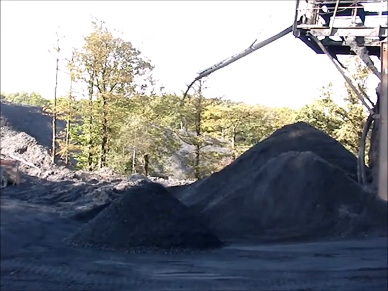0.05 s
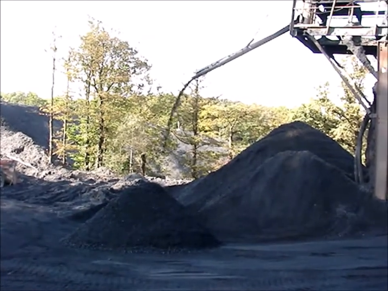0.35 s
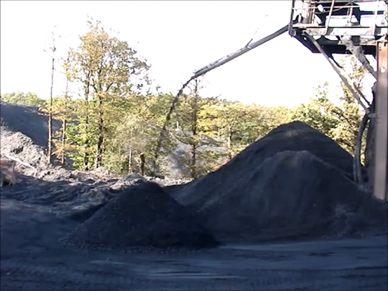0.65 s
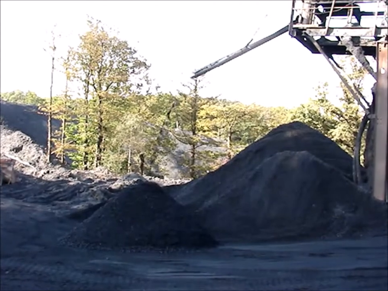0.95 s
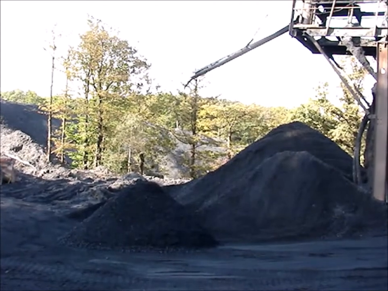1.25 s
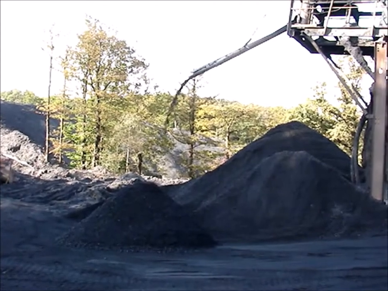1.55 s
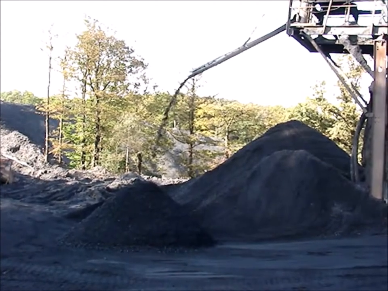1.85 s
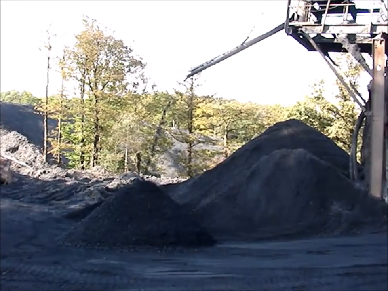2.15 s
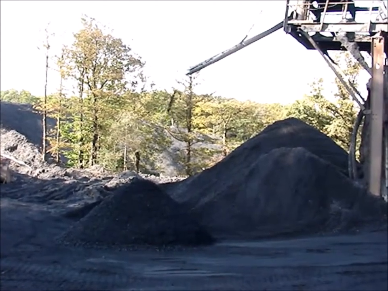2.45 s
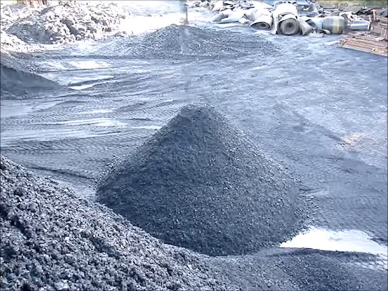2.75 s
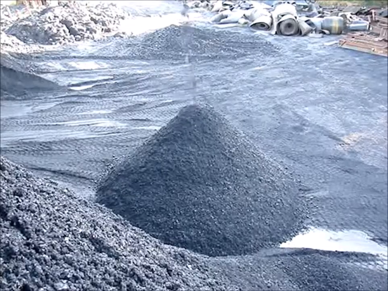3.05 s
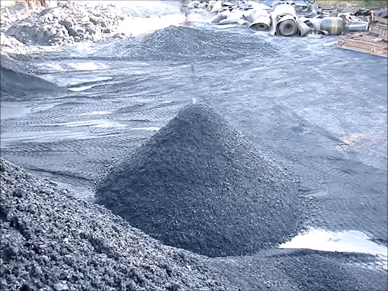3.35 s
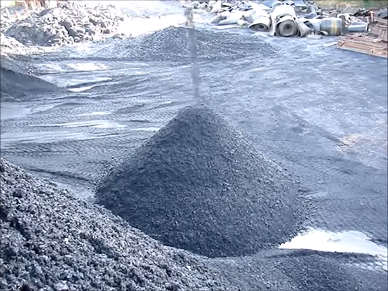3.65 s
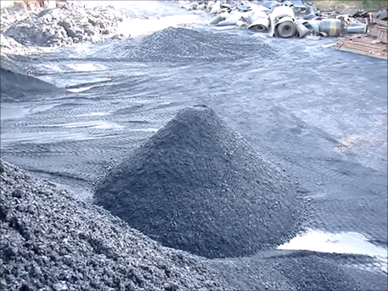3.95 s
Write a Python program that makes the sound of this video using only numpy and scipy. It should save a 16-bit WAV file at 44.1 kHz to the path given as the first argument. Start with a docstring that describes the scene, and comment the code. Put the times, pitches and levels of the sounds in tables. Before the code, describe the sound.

Loose coal falls on a pile, grit hissing and lumps clattering, first distant, then closer.

```python
"""Loose coal pours off a conveyor onto a heap in an open yard. Fines rustle, pebbles and grit patter,
and lumps crack down and scatter chips, some knocking on the conveyor's steel.
Plant machinery rumbles and hums nearby. One microphone listens from across the yard,
then, after a moment of silence, from nearer, above the heap."""
import sys
import numpy as np
from scipy import signal
from scipy.fft import rfft, irfft
from scipy.io import wavfile
from scipy.ndimage import uniform_filter1d, map_coordinates

SR = 44100
rng = np.random.default_rng(int(sys.argv[2]) if len(sys.argv) > 2 else 0)


def dump_mix(stems):
    """Bounce the given channels to the path in sys.argv[1] as a 16-bit WAV at rate SR."""
    frames = np.atleast_2d(stems).T  # one column per channel
    limited = np.clip(frames, -1, 1)  # hard clip at full scale
    pcm = np.round(limited * 32767).astype(np.int16)
    wavfile.write(sys.argv[1], SR, pcm)


N = 176400
GAP_START_S, GAP_END_S = 2.631, 2.682  # the silence between the two microphone positions

# Lumps landing; hard ones rise quickly, crumbling ones slowly:
# start_s, level_db, thud_db, crack_db, ring_hz, rise_s
LANDINGS = [(0.2001, -14.5, -10, -8.5, 3216, 0.000087), (.232, -18, -20, -24, 1193, 0.0012),
            (0.263, -20.5, -14, -2.5, 2006, 0.00084), (0.3249, -10, -18.5, -16, 3570, 0.0039),
            (0.344, -14, -9.5, -6, 2290, 0.00012), (.703, -18.5, -16, -1.5, 1400, 0.0037),
            (0.75, -19, -11, -15, 1110, 0.0012), (.921, -20.5, -4, -11, 2910, 0.00058),
            (1.0265, -11.5, -13.5, -6, 2200, 0.00015), (1.066, -12.5, -9, -15, 2020, 0.0035),
            (1.254, -18.5, -15, -9.5, 1980, .00015), (1.322, -22, -21, -5, 1190, .0005),
            (1.421, -18.5, -5, -12.5, 3050, 0.00082), (1.5392, -14.5, -5.5, -4.5, 4010, 0.00027),
            (1.6893, -11, -5.5, -8.5, 3563, 0.00045), (1.736, -18.5, -2.5, -10, 2970, 0.00089),
            (1.7674, -14.5, -7.5, -21.5, 1110, 0.0001), (1.892, -25, -12, 3, 1910, 0.00045),
            (1.913, -22.5, -22, 1, 4770, 0.00044), (1.958, -15.5, -8, -7, 3080, .00012),
            (2.0055, -12.5, -5.5, -15, 1905, 0.00083), (2.031, -14, -12.5, -27, 2750, 0.0029),
            (2.114, -15, -7.5, -1, 2750, 0.0047), (2.194, -21.5, -20, -1, 2120, 0.00076),
            (2.299, -19, -11, -4, 2000, .001), (2.3922, -16.5, -8.5, -18, 4120, .00012),
            (2.413, -15.5, -8, -4, 4460, 0.00014), (2.463, -16, -8, -8, 1406, 0.00015),
            (2.5679, -16.5, -9, -9, 4740, 0.0001), (2.6838, -16, -8, -11, 2650, 0.00014),
            (2.729, -19, -1, -1.5, 3920, .0005), (2.798, -9, -23, -8, 2736, 0.0021),
            (2.8398, -10, -22, -12, 4480, 0.0017), (2.8644, -12, -29, -1.5, 4560, 0.00062),
            (2.944, -13, -23, -3.5, 2730, 0.0018), (2.9630, -8, -30, -7.5, 3020, 0.00023),
            (3.04, -16, -7.5, -3.5, 2460, 0.00081), (3.092, -6.5, -11.5, -2.5, 2340, 0.0036),
            (3.108, -16, -3, -22, 1750, 0.0015), (3.128, -8, -20, -6.5, 3200, 0.0013),
            (3.154, -9.5, -13, -8.5, 3560, 0.00082), (3.2306, -8, -8, -28, 1950, 0.00013),
            (3.2435, -15, -19, -7, 3600, .00015), (3.285, -9.5, -24, -7.5, 2626, 0.0018),
            (3.3577, -16, -21.5, -6, 3540, 0.00011), (3.384, -9.5, -24, -12.5, 1990, 0.0033),
            (3.3937, -9.5, -7.5, -10.5, 2000, 0.00015), (3.4664, -10.5, -33, -5, 3120, 0.00023),
            (3.498, -14, -24, -3, 2470, 0.00043), (3.5140, -11.5, -32, -14, 3350, .0006),
            (3.5901, -8.5, -27, -25, 2580, .00012), (3.6276, -10.5, -20, -7.5, 2614, 0.00032),
            (3.6928, -13.5, -32, -5.5, 2960, 0.00048), (3.733, -17, -20, -7, 2760, 0.00078),
            (3.745, -14.5, -28, -3, 4300, 0.00091), (3.776, -17.5, -32, 0, 4360, 0.00012),
            (3.8134, -10.5, -23, -13, 2830, 0.0001), (3.858, -16, -19, -6, 3900, 0.0004),
            (3.875, -20, -18, -3, 2750, 0.00092), (3.8998, -17, -20, -15, 3730, .001),
            (3.941, -16.5, -7, -6.5, 4720, 0.00036)]
# Spectrum of a hard piece's first contact: frequency_hz, level_db
SNAP_SPECTRUM = [(300, -16), (900, -5), (2000, 0.5), (3800, 3.5), (5500, -4), (7500, -8.5), (10000, -25)]
# Spectrum of crunching chips: frequency_hz, level_db
CRUNCH_SPECTRUM = [(800, -43), (1500, -3.5), (2200, 2.5), (3000, 3.5), (4200, 0.5), (5200, -12.5),
                   (7000, -46)]
# Loudness of the plant, which the conveyor's rattle follows: time_s, level_db
PLANT_LEVEL = [(0, -41), (.9, -41.5), (1.8, -40.5), (2.62, -40), (2.68, -33), (3.03, -36), (3.2, -44),
               (3.45, -43), (4, -50)]


def far_pour():
    """From across the yard the fines blur into a dry rustle, with pebbles and grit pattering in it."""
    # Spectra of fines and pebbles at a distance: frequency_hz, level_db
    fines_spectrum = [(150, -54), (250, -9), (368, 0), (682, -2.5), (760, 1), (1720, 0.5), (1890, 2.5),
                      (2530, -0.5), (5070, -7.5), (6390, -36), (7460, -17), (10000, -33), (13000, -48.5),
                      (22000, -120)]
    pebble_spectrum = [(150, -35), (400, -14.5), (1000, -20.5), (2000, -24), (3500, 1.5), (4800, 0.5),
                       (6000, -3.5), (8000, -6.5), (10000, -19)]
    # Strength of the pour: time_s, level_db
    flow = [(0, -29.5), (.13, -29.5), (.3, -31), (.42, -32), (.63, -31.5), (.7, -29), (.9, -30), (1.1, -30),
            (1.3, -30.5), (1.5, -31.5), (1.66, -33), (1.82, -31), (1.94, -30), (2.08, -30), (2.3, -30.5),
            (2.6, -29.5)]
    flutter = amp(0.5 + 0.94 * wobble(24.72))
    fines = flutter * patchy(colour(ticks(9000, N), fines_spectrum), depth_db=2.0)
    patter = amp(-7.0) * pebbles(pebble_spectrum, per_s=170, spread_db=5, t60=0.033, ring_hz=2484)
    return amp(curve(flow)) * (fines + patter + amp(-14) * grit())


def near_pour():
    """From above the heap the pour is brighter and its pebbles and grit stand out."""
    # Spectra of fines and pebbles close up: frequency_hz, level_db
    fines_spectrum = [(150, -34), (250, -2), (403, -3.5), (846, 3), (1020, -1.5), (1690, 8.5), (1950, 5.5),
                      (2450, 5.5), (2910, 5), (4210, 2.5), (7460, -14), (10000, -16.5), (13000, -57),
                      (22000, -120)]
    pebble_spectrum = [(150, -24), (400, -7), (1000, 1), (2000, -1.5), (3500, -1), (4800, -1), (6000, -4),
                       (8000, -6), (10000, -18.5)]
    # Strength of the pour: time_s, level_db
    flow = [(2.7, -25.5), (2.894, -23), (2.956, -23), (3.644, -29), (3.934, -30.5), (4.0, -29.5)]
    flutter = amp(-2.5 + 0.77 * wobble(24.81))
    fines = flutter * patchy(colour(ticks(9000, N), fines_spectrum), depth_db=0.5)
    patter = amp(-4.5) * pebbles(pebble_spectrum, per_s=150, spread_db=7, t60=0.032, ring_hz=2820)
    return amp(curve(flow)) * (fines + patter + amp(-9.5) * grit())


def pebbles(spectrum, per_s, spread_db, t60, ring_hz):
    """Small pieces land at random, each with a short dry crunch and a trace of a ring."""
    out, t = np.zeros(N), np.arange(SR // 25) / SR
    candidates = 1200
    for (when, chance, size), pitch in zip(rng.random((candidates, 3)), rng.standard_normal(candidates)):
        ring = np.sin(2 * np.pi * ring_hz * np.exp(.45 * pitch) * t)
        envelope = amp(spread_db * size ** 2 - 60 * t / t60)
        sound = (rng.standard_normal(len(t)) + .3 * ring) * envelope
        if chance < per_s * N / SR / candidates:
            add(out, when * N / SR, sound)
    return colour(out, spectrum)


def grit(per_s=150, t60=.006):
    """Sharp grains tick one by one: most are faint, a few stand out."""
    # Spectrum of the grains: frequency_hz, level_db
    grit_spectrum = [(1500, -25), (3500, 0.5), (5000, 2), (7500, -5.5), (10000, -18)]
    out, t = np.zeros(N), np.arange(SR // 200) / SR
    for when, size in rng.random((int(per_s * N / SR), 2)):
        db = -4 * np.log(size + .03)
        add(out, when * N / SR, rng.standard_normal(len(t)) * amp(db - 60 * t / t60))
    return colour(out, grit_spectrum)


def lumps(snap_t60=0.0072, ring_t60=0.052):
    """Each lump snaps, rings, cracks, crunches and thuds into the heap; the bright part dies first."""
    # Spectra of a landing's bright crack and low thud: frequency_hz, level_db
    crack_spectrum = [(3000, -19.5), (4700, 5.5), (5600, -0.5), (7000, -8.5), (8500, -14), (10000, -29.5)]
    thud_spectrum = [(80, -31), (200, -9.5), (420, -7), (1100, 0.5), (1500, -0.5), (2300, -35)]
    out, t = np.zeros(N), np.arange(SR // 8) / SR
    for s, db, thud_db, crack_db, hz, rise_s in LANDINGS:
        hardness = np.exp(-rise_s / 0.00084)  # crumbling lumps barely snap
        contact = colour(rng.standard_normal(len(t)), SNAP_SPECTRUM)
        snap = amp(-8.5 - 60 * t / snap_t60) * hardness * contact
        ring = amp(-5 - 60 * t / ring_t60) * (1 - np.exp(-t / rise_s)) * dull_ring(hz, t)
        add(out, s, amp(db) * (snap + ring))
        add(out, s, amp(db - 0.5 + crack_db) * clatter(crack_spectrum, rise_s, t60=0.04))
        add(out, s, amp(db - 6) * clatter(CRUNCH_SPECTRUM, rise_s, t60=0.068))
        add(out, s, amp(db - 4 + thud_db) * clatter(thud_spectrum, rise_s + 0.0027, t60=0.072))
    return out


def clatter(spectrum, rise_s, t60, scatter_db=-31, scatter_t60=0.14):
    """A quick clatter of chips, then a weak scatter as they run off."""
    t = np.arange(SR // 6) / SR
    chips = colour(ticks(per_s=20000, size=len(t)), spectrum)
    fall = amp(-60 * t / t60) + amp(scatter_db - 60 * t / scatter_t60)
    return chips * (1 - np.exp(-t / rise_s)) * fall


def dull_ring(hz, t, width_hz=110):
    """Coal rings impurely: a drifting phase smears its tone."""
    drift = np.cumsum(rng.standard_normal(len(t))) * np.sqrt(2 * np.pi * width_hz / SR)
    return np.sin(2 * np.pi * hz * t + drift)


def rebounds(within_s=0.019, t60=0.021):
    """Three chips break off each lump and clack down just after it, the later the softer."""
    out, t = np.zeros(N), np.arange(SR // 40) / SR
    for s, db, *_ in LANDINGS:
        for lateness in rng.random(size=3):
            clack = colour(rng.standard_normal(len(t)), CRUNCH_SPECTRUM) * amp(-60 * t / t60)
            add(out, s + .003 + lateness * within_s, amp(db - 17.5 - 6 * lateness) * clack)
    return out


def clicks(t60=0.016):
    """Single hard pebbles snap on the heap without breaking."""
    # Pebbles that click out of the pour: start_s, level_db
    hard_pebbles = [(0.077, -21), (.674, -23), (.794, -22.5), (0.95, -23), (1.196, -23), (1.411, -19.5),
                    (1.865, -21), (2.127, -20), (2.206, -21), (2.439, -17), (2.607, -29.5), (2.789, -15.5),
                    (3.181, -20.5), (3.558, -16)]
    out, t = np.zeros(N), np.arange(SR // 40) / SR
    for s, db in hard_pebbles:
        add(out, s, amp(db - 60 * t / t60) * colour(rng.standard_normal(len(t)), SNAP_SPECTRUM))
    return out


def conveyor(rattle_db=-50.5):
    """Fines keep the steel ringing faintly, and now and then a lump knocks on it."""
    # Modes of the steel: pitch_hz, level_db, t60_s
    steel_modes = [(450.8, -4.5, 0.13), (624, -2, 0.082), (1137, 0, 0.067)]
    # Lumps striking it: start_s, level_db, tilt_db_per_octave
    knocks = [(.232, -23, 0), (.328, -21, 0), (.345, -21.5, -7), (1.027, -23.5, 0), (1.768, -29.5, 5),
              (2.298, -41, 17), (3.109, -26, 12.5), (3.232, -30, 11)]
    out, t = np.zeros(N), np.arange(SR // 3) / SR
    plant_db = curve(PLANT_LEVEL)
    for hz, mode_db, t60 in steel_modes:
        ring = amp(-60 * t / t60) * np.sin(2 * np.pi * hz * t) * (1 - np.exp(-t / 0.00067))
        rattle = unit(signal.fftconvolve(ticks(820, N), ring)[:N])
        out += amp(rattle_db + mode_db + plant_db - plant_db.max()) * rattle
        octaves = np.log2(hz / steel_modes[1][0])
        for s, db, tilt_db in knocks:
            add(out, s, amp(db + mode_db + tilt_db * octaves) * ring)
    return out


def plant(bass_hz=115):
    """Nearby machinery rumbles with a few unsteady drive tones; its deepest part thins out after 3 s."""
    # Spectrum of the rumble: frequency_hz, level_db
    rumble_spectrum = [(20, -11.5), (50, -10), (65, -8), (97, -8.5), (128, -4), (216, -4), (300, -4),
                       (380, -2.5), (700, -3.5), (1000, -8.5), (1600, -58.5)]
    # Hum of the drives: pitch_hz, level_db
    drive_tones = [(49, -18), (124, -13), (174, -18.5)]
    # The deepest part against the rest: time_s, level_db
    bass_level = [(2.6, -2), (2.7, -5), (3.05, -2), (3.25, -10), (4, -4)]
    t = np.arange(N) / SR
    hum = sum(amp(db + 4.0 * wobble(7.22)) * np.sin(2 * np.pi * hz * t + 0.88 * wobble(5.4))
              for hz, db in drive_tones)
    drone = amp(2.5) * colour(rng.standard_normal(N), rumble_spectrum) + hum
    deep = signal.sosfiltfilt(signal.butter(N=3, Wn=bass_hz, fs=SR, output="sos"), drone)
    return amp(curve(PLANT_LEVEL)) * (drone - deep + amp(curve(bass_level)) * deep)


def ticks(per_s, size):
    """Tiny contacts of either sign at random moments."""
    return (rng.random(size) < per_s / SR) * np.sign(rng.standard_normal(size))


def patchy(x, depth_db):
    """x with brief random patches of pitch and time made louder or softer."""
    spectrogram = signal.stft(x, nperseg=256)[2]
    patches = uniform_filter1d(rng.standard_normal(spectrogram.shape), 4, axis=0)
    patches = uniform_filter1d(patches, 6, axis=1)
    return unit(signal.istft(spectrogram * amp(depth_db * unit(patches)), nperseg=256)[1][:N])


def colour(x, spectrum):
    """x shaped by (frequency_hz, level_db) rows, at rms 1."""
    hz, db = np.transpose(spectrum)
    bins_hz = np.fft.rfftfreq(len(x), 1 / SR)
    gain = amp(np.interp(np.log(bins_hz + 1), np.log(hz + 1), db))
    return unit(irfft(rfft(x) * gain, len(x)))


def wobble(rate):
    """A smooth random curve, rate knots a second."""
    return map_coordinates(rng.standard_normal(int(N * rate / SR) + 4), [np.arange(N) * rate / SR])


def curve(rows):
    """(time_s, value) rows as one value per sample."""
    return np.interp(np.arange(N) / SR, *np.transpose(rows))


def amp(db):
    """Decibels to gain."""
    return 10 ** (np.asarray(db) / 20)


def unit(x):
    """Scaled to rms 1."""
    return x / np.sqrt(np.mean(x ** 2) + 1e-20)


def add(track, start_s, sound):
    """Mix a sound into the track."""
    part = track[int(max(start_s, 0) * SR):][:len(sound)]
    part += sound[:len(part)]


def scene():
    """The pour in mono, first far and then near, over the plant."""
    pour = np.where(np.arange(N) / SR < GAP_END_S, far_pour(), near_pour())
    return (pour + lumps() + rebounds() + clicks() + conveyor() + plant())[None]


def record(dry):
    """The sound drops out between the two microphone positions, and the highest treble is cut."""
    fade_s, top_hz = 0.0022, 10150
    t = np.arange(N) / SR
    gate = np.clip(np.maximum(GAP_START_S - t, t - GAP_END_S) / fade_s, amp(-50), 1)
    passband = np.fft.rfftfreq(2 * N, 1 / SR) < top_hz
    return irfft(rfft(dry * gate, 2 * N) * passband)[:, :N]


dry = scene()
out = record(dry)
dump_mix(out)
```